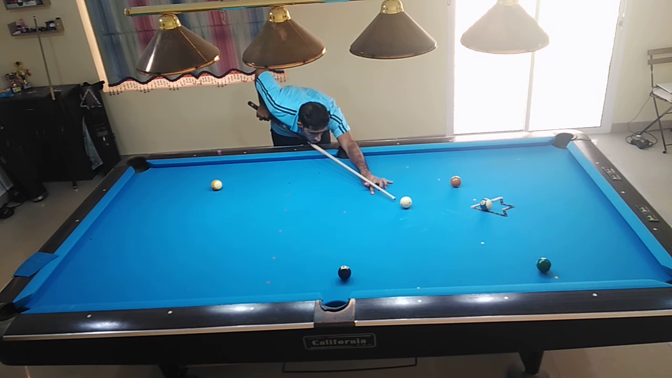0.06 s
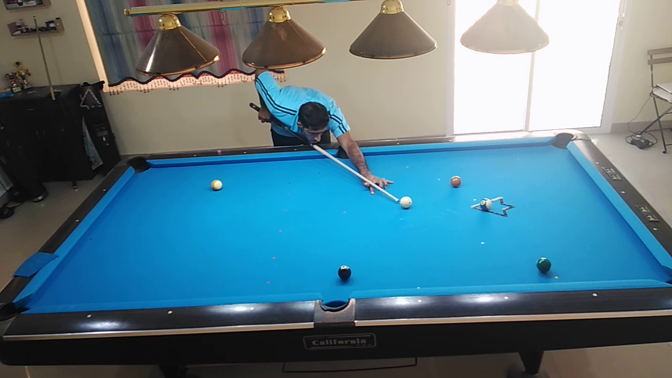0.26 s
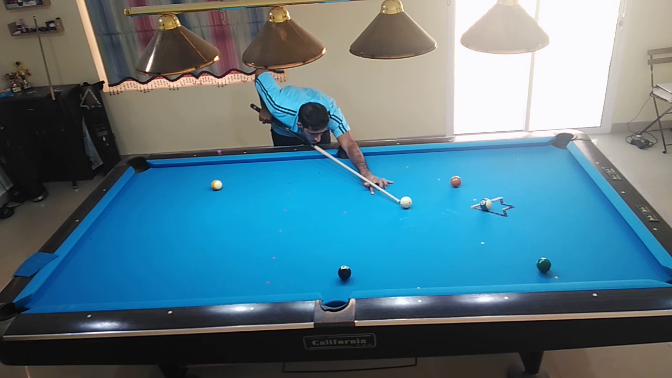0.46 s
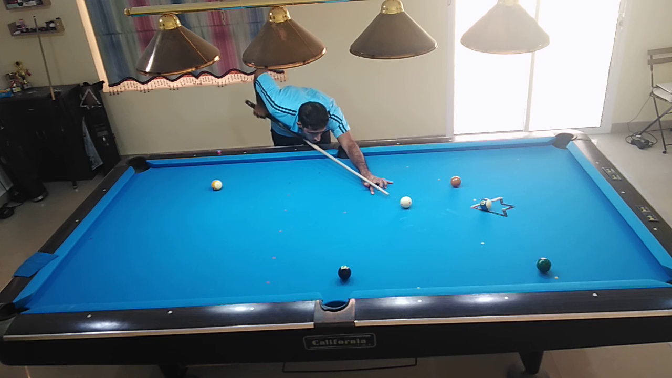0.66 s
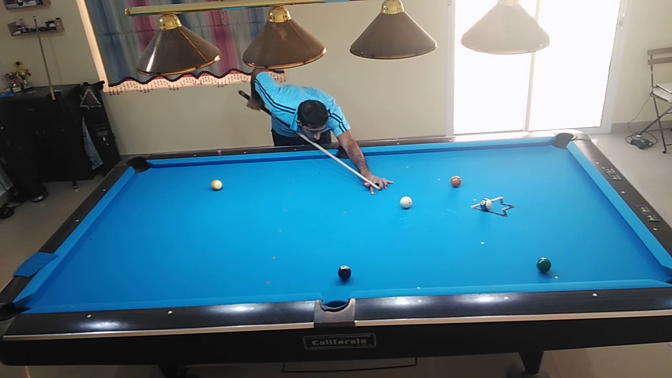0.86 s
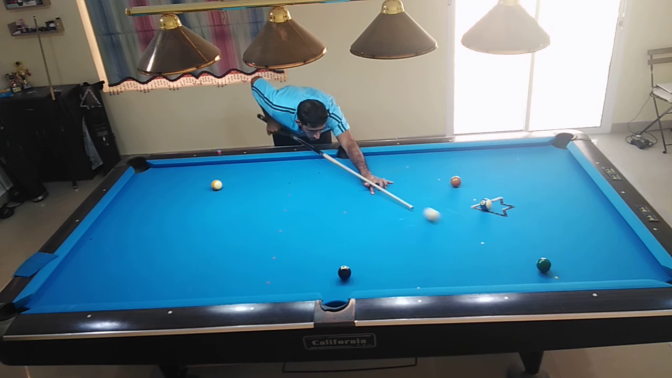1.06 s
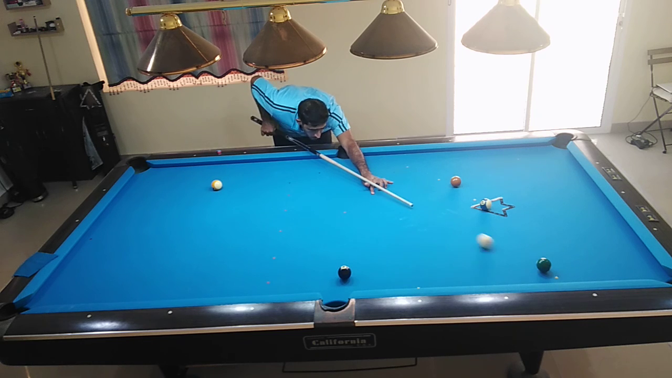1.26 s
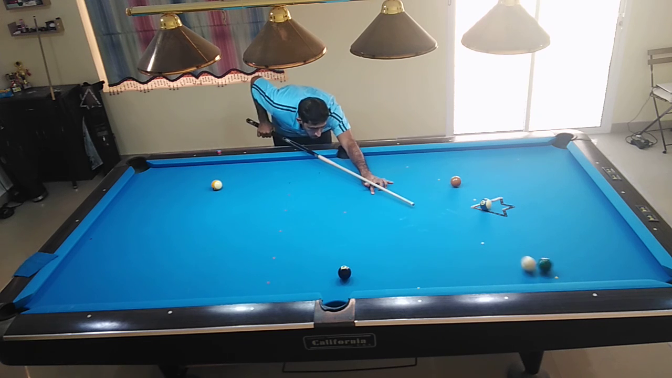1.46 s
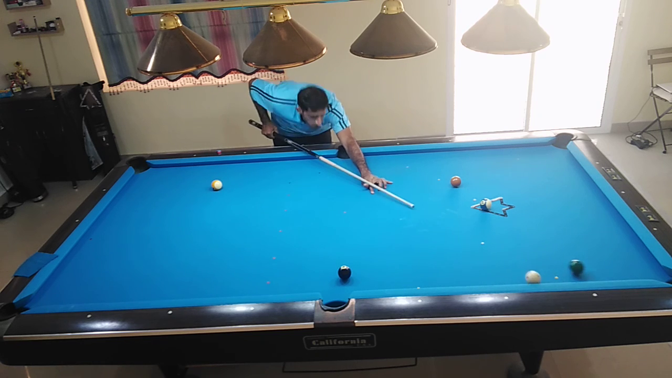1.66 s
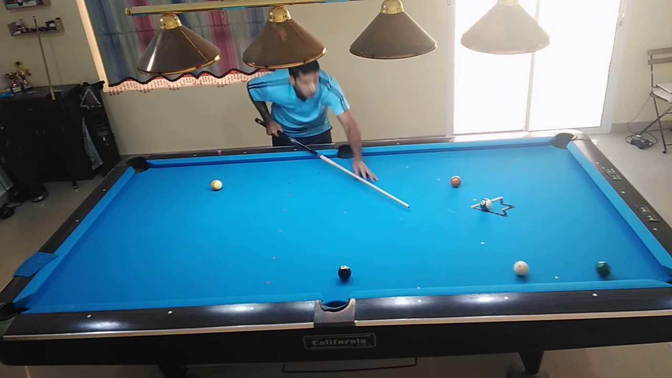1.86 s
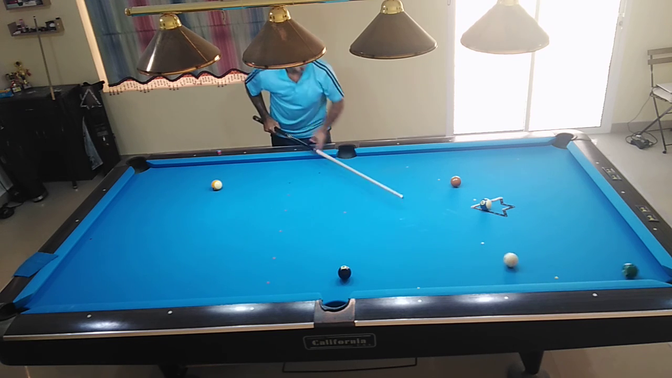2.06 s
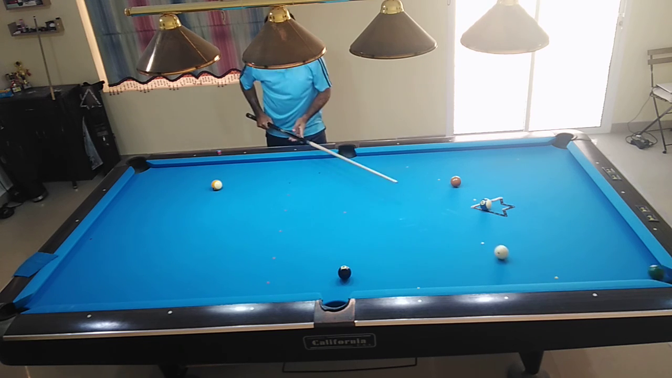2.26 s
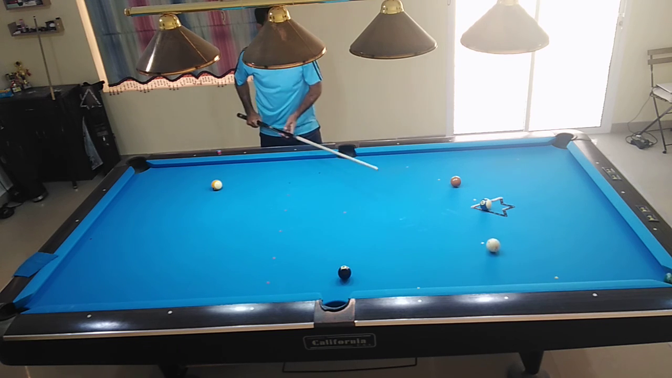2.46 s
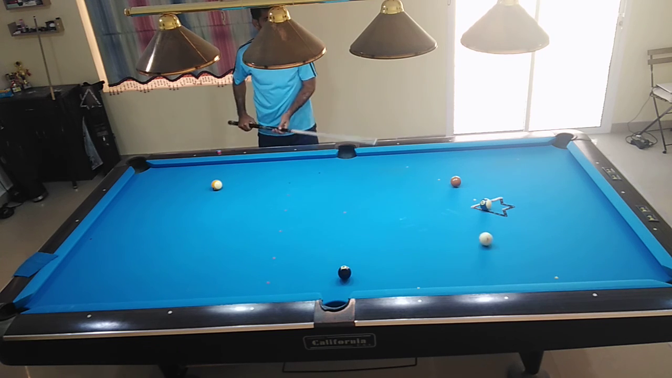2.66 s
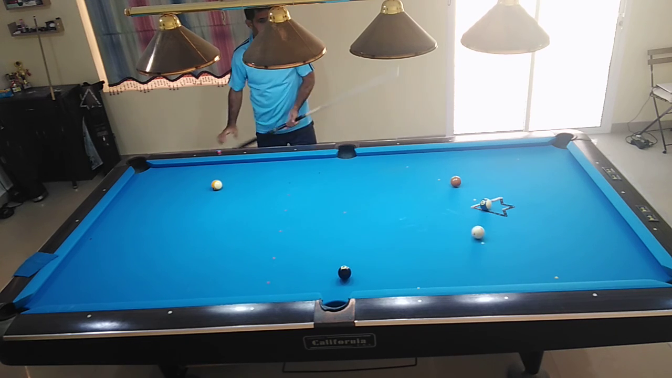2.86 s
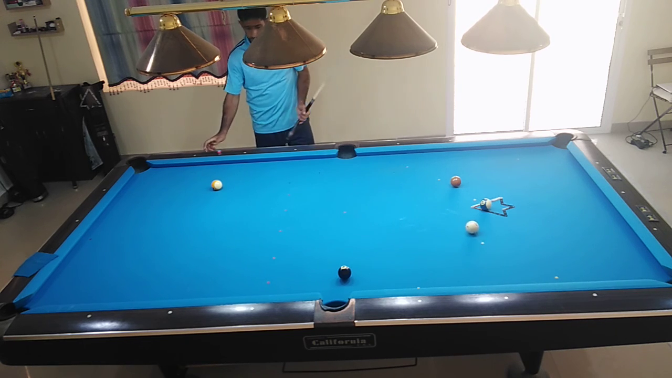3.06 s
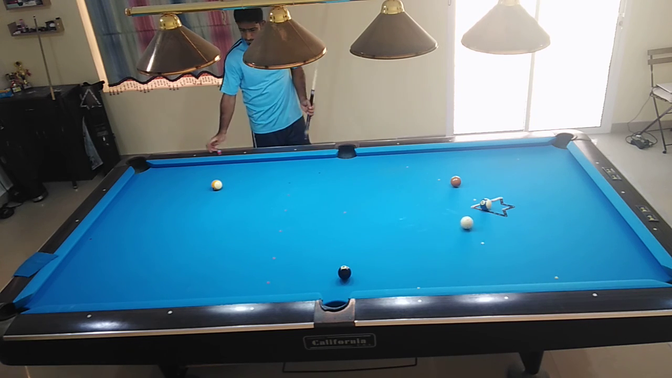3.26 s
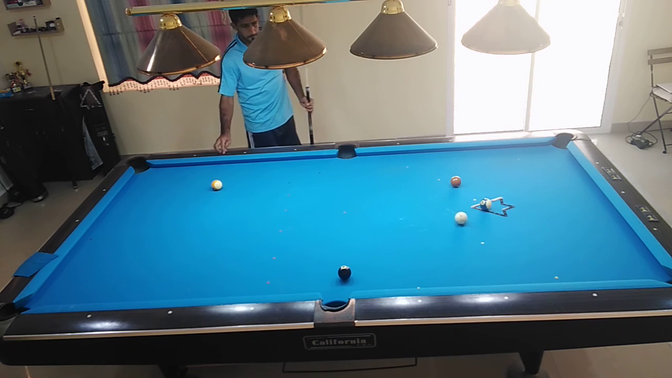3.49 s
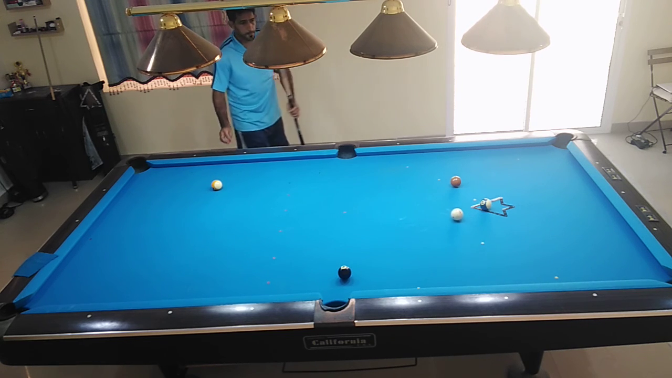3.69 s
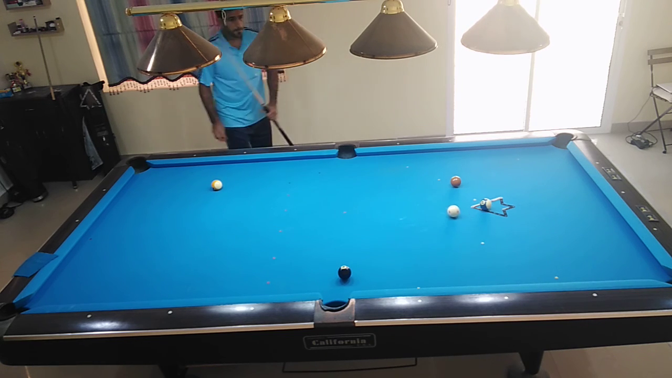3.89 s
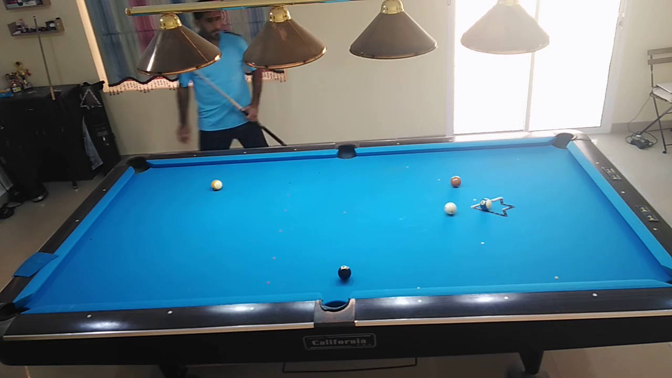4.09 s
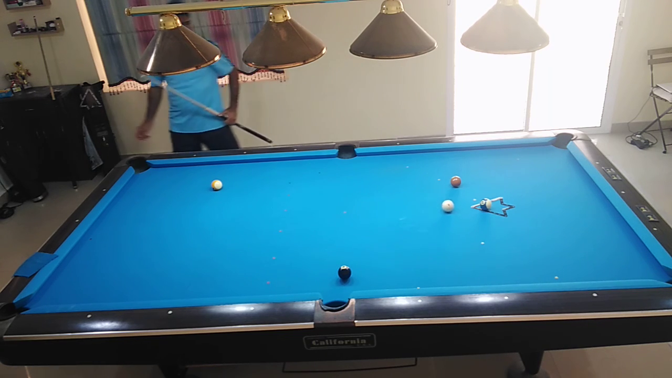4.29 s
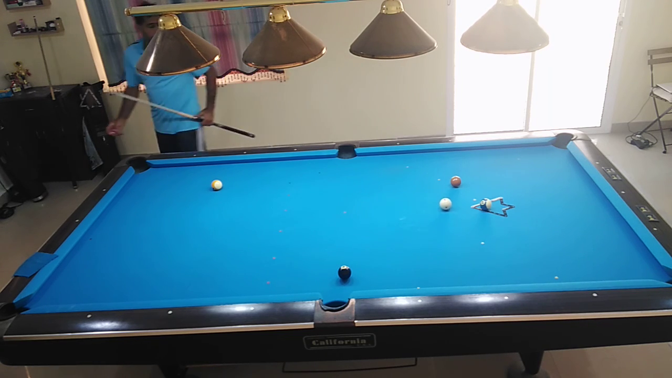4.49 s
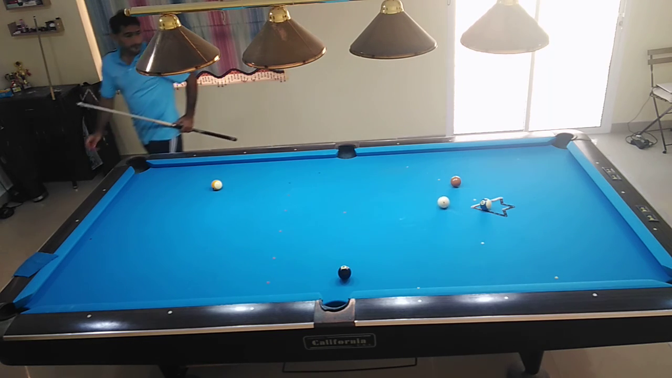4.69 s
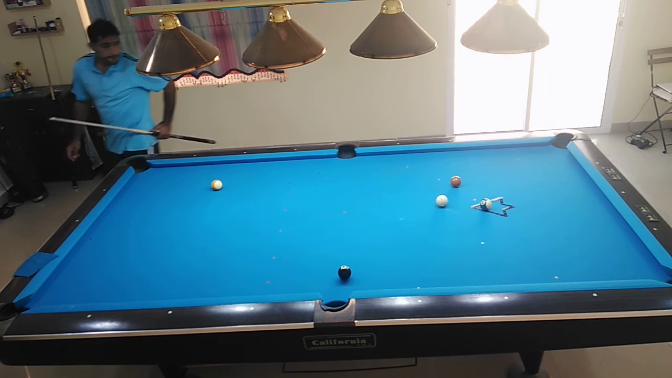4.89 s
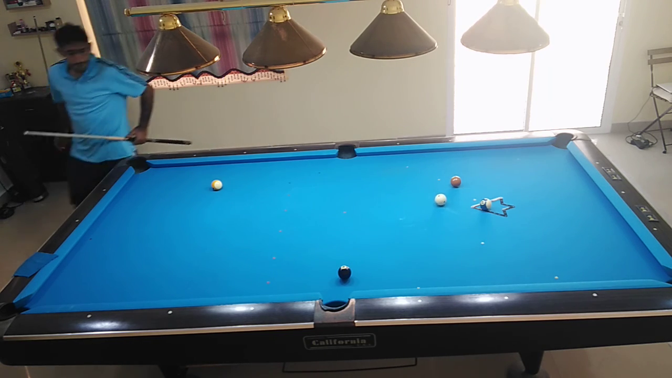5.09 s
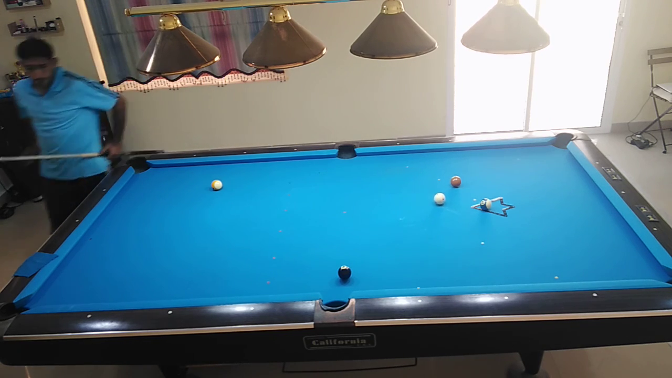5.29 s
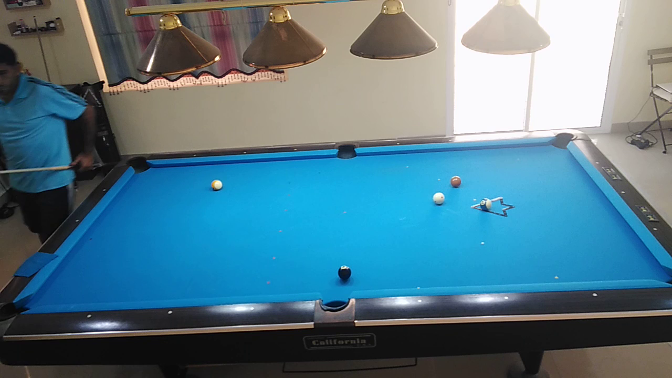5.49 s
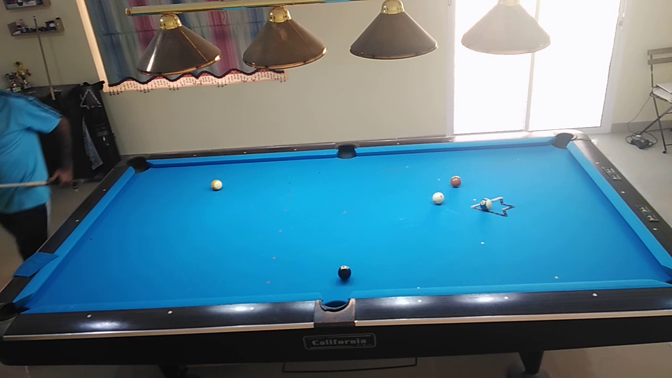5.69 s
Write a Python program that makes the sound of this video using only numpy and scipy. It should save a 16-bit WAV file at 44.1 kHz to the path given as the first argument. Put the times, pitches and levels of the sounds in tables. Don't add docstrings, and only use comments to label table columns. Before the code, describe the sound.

In a bare, reverberant games room, a cue tip taps a ball and half a second later two balls clack dryly. The struck ball rattles into a pocket, bounces down the hollow wooden return with resonant thumps, lands hard in the tray, knocks other balls and settles. Stereo microphones stand some way off, with soft room tone and faint low hum.

```python
import sys
import numpy as np
from scipy import signal
from scipy.fft import rfft, irfft
from scipy.io import wavfile
from scipy.ndimage import uniform_filter1d, map_coordinates

SR = 44100
rng = np.random.default_rng(int(sys.argv[2]) if len(sys.argv) > 2 else 0)


def amplitude_ratio(level_db):
    exponent = np.asarray(level_db, float) / 20
    return 10 ** exponent


def unload_wav(signal):
    wavfile.write(
        sys.argv[1],
        SR,
        np.round(np.clip(np.atleast_2d(signal).T, -1, 1) * 32767).astype(np.int16),
    )


N = 253134
LEFT_LAG = 18

# (frequency [Hz], width [Hz], boost [dB])
CABINET = [(165, 15, 4.6), (201, 41, 5), (278, 10, 9), (351.5, 14, 6), (459, 56, 1), (595, 30, 3.6),
           (658.6, 10, 5.5), (793, 120, 3.1), (1112, 150, 3.8), (2270, 1200, 1.7)]
# (frequency [Hz], level [dB per Hz])
POCKET_TONE = [(40, -28), (70, -6), (130, -5.5), (190, 0.5), (320, -3.5), (450, -7), (680, -5.5),
               (1000, -16.5), (1600, -17.5), (2500, -22.5), (4000, -34), (6000, -45.5), (9000, -57),
               (13000, -62.5)]
# (time [s], peak level [dB], hardness [1 = usual])
BRUSH = [
    (2.848, -32, .7),
    (4.150, -29.5, .9),
    (4.942, -24, 1.4),
]


def unit(x):
    return x / np.sqrt(np.mean(x ** 2) + 1e-20)


def along(points, hz):
    f, v = np.transpose(points)
    return np.interp(np.log(hz + 1), np.log(f + 1), v)


def wobble(rate):
    knots = rng.standard_normal(int(N * rate / SR) + 4)
    return map_coordinates(knots, [np.arange(N) * rate / SR])


def swells(rows, rise_db, fall_db):
    t = np.arange(N) / SR
    levels = []
    for s, hold, db in rows:
        before, after = np.maximum(s - t, 0), np.maximum(t - s - hold, 0)
        levels.append(db - rise_db * before - fall_db * after)
    return np.max(levels, axis=0)


def stereo(z, hz, alike):
    turn = np.arccos(np.clip(along(alike, hz), -1, 1))[:, None] / 2
    mid, side = z[0] * np.cos(turn), z[1] * np.sin(turn)
    return np.array([mid + side, mid - side])


def pulse(tone, modes, hardness):
    hz = np.fft.rfftfreq(8192, 1 / SR)
    db = along(tone, hz) + 6 * (hardness - 1) * np.log2(np.clip(hz, 100, 8000) / 600)
    db = db - 40 * np.log2(np.maximum(hz / tone[-1][0], 1))
    for centre, width, boost_db in modes:
        db = db + boost_db / (1 + (2 * (hz - centre) / width) ** 2)
    ceps = irfft(np.log(amplitude_ratio(np.maximum(db, db.max() - 110))))
    ceps[1:4096] *= 2
    ceps[4097:] = 0
    shape = irfft(np.exp(rfft(ceps)))
    return shape / np.linalg.norm(shape)


def room(direct, rise):
    # (frequency [Hz], t60 [s])
    decay = [(100, 0.95), (300, 0.63), (550, 0.59), (800, 0.55), (1200, .55), (2000, 0.72), (5000, 0.78),
             (8000, 0.88), (12000, 0.41)]
    # (frequency [Hz], left-right likeness [-1..1])
    likeness = [(60, .93), (250, .88), (400, .8), (700, .5), (1200, .05), (4000, .05)]
    hz, t, z = signal.stft(rng.standard_normal((2, SR * 13 // 20)), SR, nperseg=256)
    t60 = along(decay, hz)[:, None]
    bloom = 1 - np.exp(-t / 0.033 * (hz[:, None] / 170) ** 2)
    z = stereo(z, hz, likeness) * bloom * amplitude_ratio(-60 * t / t60) / np.sqrt(t60)
    tail = signal.istft(z, SR, nperseg=256)[1]
    t = np.arange(tail.shape[1]) / SR
    density = np.clip(0.012 + (t / .2) ** 2, .002, 1)
    echoes = rng.standard_normal(len(t)) * (rng.random(len(t)) < density) / np.sqrt(density)
    early = echoes * amplitude_ratio(-60 * t / 0.22) * 0.081
    early = np.array([np.roll(early, LEFT_LAG), early])
    tail = tail / np.std(tail[:, :SR // 20]) * .1 + early
    tail = tail * (1 - np.exp(-t / rise))
    tail = tail / np.linalg.norm(tail[0])
    tail[[0, 1], [LEFT_LAG, 0]] += direct
    return tail


def blows(events, tone, modes, trim_db, direct, rise):
    out = np.zeros((2, N + 2 * SR))
    for s, db, hardness, pan_db in events:
        hit = pulse(tone, modes, hardness)
        heard = signal.fftconvolve(room(direct, rise), hit[None], axes=1)
        gain = amplitude_ratio(db + trim_db + np.array([[.5], [-.5]]) * pan_db)
        out[:, round(s * SR):][:, :heard.shape[1]] += gain * heard
    return out[:, :N]


def rattle(rule, count, hardness, pan_db):
    soft, soften_s, drift_db = .6, .09, 3
    s, db, gap, stretch, fade_db = rule
    gaps = gap * stretch ** np.arange(count)
    t = np.cumsum(gaps) - gaps
    fresh = np.exp(-t / soften_s)
    hard = soft + (hardness - soft) * fresh
    return list(zip(s + t, db - fade_db * t, hard, pan_db + drift_db * (1 - fresh)))


def room_tone():
    # (frequency [Hz], level [dB per Hz])
    air_tone = [(30, -29.5), (55, -6), (90, -4), (125, -3), (175, -5), (230, -6.5), (350, -4), (500, -6),
                (750, -12), (1200, -17.0), (2000, -22.5), (3000, -32.0), (4500, -43.0), (7000, -54),
                (10000, -62), (13000, -61.5)]
    # (frequency [Hz], left-right likeness [-1..1])
    likeness = [(60, 0.93), (130, 0.95), (290, 0.84), (620, 0.51), (1360, -0.25), (2980, 0.22)]
    hz, _, z = signal.stft(rng.standard_normal((2, N)), SR, nperseg=2048)
    field = rng.standard_normal(z.shape[1:])
    field = uniform_filter1d(uniform_filter1d(field, 15, 0), 3, 1)
    patches_db = 2.2 * unit(field) / (1 + hz[:, None] / 900)
    z = stereo(z, hz, likeness) * amplitude_ratio(along(air_tone, hz)[:, None] + patches_db)
    return unit(signal.istft(z, SR, nperseg=2048)[1][:, :N]) * amplitude_ratio(-53.5)


def floor_rumble():
    # (start [s], length [s], level [dB])
    shudders = [
        (.24, .14, -56),
        (2.72, .06, -40),
        (2.95, .3, -46),
        (3.75, .02, -57),
        (4.3, .08, -52),
    ]
    band = signal.butter(2, [55, 120], "band", fs=SR, output="sos")
    low = signal.sosfilt(band, rng.standard_normal(N))
    return unit(low) * (amplitude_ratio(-72) + amplitude_ratio(swells(shudders, rise_db=70, fall_db=60)))


def appliances():
    # (frequency [Hz], level [dB rms])
    motor_lines = [(87, -67.5), (177, -57)]
    t = np.arange(N) / SR
    out = np.zeros(N)
    for hz, db in motor_lines:
        level = amplitude_ratio(db - 1 + wobble(36))
        out += level * np.sin(2 * np.pi * hz * t + 1.4 * wobble(9.2))
    return out


def foot_shifts():
    # (time [s], peak level [dB])
    thuds = [(0.149, -56), (0.244, -41.5), (0.355, -46), (0.488, -49), (0.949, -37), (1.549, -44),
             (2.414, -44.5), (2.437, -46), (2.494, -40.5), (3.598, -28), (3.704, -33.5), (3.739, -32),
             (3.89, -54.5), (5.147, -39)]
    # (frequency [Hz], level [dB per Hz])
    thud_tone = [(25, -47), (50, -17), (85, 5.5), (180, -3.5), (450, -12), (900, -29.5), (1500, -57.5)]
    events = [(s, db, .8, 0) for s, db in thuds]
    return blows(events, thud_tone, [], 15, direct=2.5, rise=.01)


def far_tick():
    # (time [s], peak level [dB], hardness [1 = usual], left-right [dB])
    ticks = [
        (5.342, -66.5, 1, 1),
    ]
    # (frequency [Hz], level [dB per Hz])
    tick_tone = [(1500, -30), (3000, 2), (5000, -3), (7500, -11)]
    return blows(ticks, tick_tone, [], 25, direct=0.36, rise=.005)


def cue_strike():
    # (time [s], peak level [dB], hardness [1 = usual], left-right [dB])
    strikes = [
        (0.942, -21, 0.85, 1),
    ]
    # (frequency [Hz], level [dB per Hz])
    strike_tone = [(150, -29), (250, -19), (430, -7), (600, 0), (800, 1), (1010, 2), (1300, -4.5),
                   (1630, -13.5), (2050, 0), (2600, -12), (3400, -6), (4300, -15), (5200, -20.5),
                   (6500, -32), (8000, -43), (10000, -62.5)]
    # (frequency [Hz], width [Hz], boost [dB])
    shaft = [(791, 40, 5), (985, 50, 5), (2058, 40, 9), (2358, 30, 11), (2724, 40, 7), (3075, 60, 9),
             (3410, 50, 6), (4156, 40, 9), (5023, 50, 6), (5755, 50, 6)]
    return blows(strikes, strike_tone, shaft, 26.5, direct=.15, rise=.005)


def ball_clack():
    # (time [s], peak level [dB])
    clacks = [
        (1.4316, -34),
        (1.4365, -33),
        (1.4405, -33),
        (1.4432, -20.5),
        (1.4458, -14.5),
        (1.4479, -16.5),
        (1.4604, -21.5),
        (1.483, -21.5),
    ]
    # (frequency [Hz], level [dB per Hz])
    clack_tone = [(360, -36), (600, -31), (850, -19.5), (1150, -13), (1550, -5), (2000, 0.5), (2400, 0),
                  (2900, -6.0), (3500, -15.5), (4300, -34), (5200, -49.5), (6500, -54.5), (8500, -67.5)]
    events = [(s, db, .85, 0) for s, db in clacks]
    return blows(events, clack_tone, [], 17.45, direct=0.43, rise=0.004)


def track_roll():
    # (start [s], length [s], level [dB])
    runs = [
        (2.69, .1, -34),
        (2.94, .03, -39),
        (3.09, .04, -25),
        (3.26, .08, -29),
        (3.44, .04, -21.5),
        (3.59, .02, -32),
        (3.71, .04, -37),
    ]
    # (frequency [Hz], level [dB per Hz])
    bump_tone = [(35, -29), (80, -27.5), (150, 1.5), (220, -1.5), (300, -8), (450, -9.5), (670, -7),
                 (1080, -20.5), (1600, -48), (2500, -54.5), (4000, -67)]
    chance, size = rng.random((2, N)), rng.standard_normal((2, N))
    bumps = (chance < 600 / SR) * size
    drum = signal.fftconvolve(bumps, pulse(bump_tone, CABINET, 0.62)[None], axes=1)[:, :N]
    pair = np.array([drum[0] + .35 * drum[1], drum[0] - .35 * drum[1]])
    return unit(pair) * amplitude_ratio(swells(runs, rise_db=160, fall_db=260) - 3.5)


def pocket_drop():
    # (start [s], first peak [dB], first gap [s], gap growth [ratio], fade [dB/s])
    rim = (2.562, -27, .004, 1.35, -330)
    # (start [s], first peak [dB], first gap [s], gap growth [ratio], fade [dB/s])
    inside = (2.609, -15, .02, 1.11, 30)
    on_rim = rattle(rim, count=4, hardness=1.5, pan_db=.4)
    in_pocket = rattle(inside, count=6, hardness=.78, pan_db=.4)
    out = blows(on_rim, POCKET_TONE, CABINET, 22.8, direct=0.091, rise=0.0033)
    return out + blows(in_pocket, POCKET_TONE, CABINET, 22.7, direct=0.079, rise=0.0048)


def gully_lip():
    # (start [s], first peak [dB], first gap [s], gap growth [ratio], fade [dB/s])
    lip = (2.967, -19.5, .01, 1.9, -55)
    # (frequency [Hz], level [dB per Hz])
    lip_tone = [(60, -19.5), (200, 0), (450, 3.5), (700, 3), (1000, -6.5), (1500, -18), (2500, -27.5),
                (4000, -40.5), (6000, -47.5), (9000, -63.5)]
    # (start [s], first peak [dB], first gap [s], gap growth [ratio], fade [dB/s])
    fall = (3.088, -8, .02, .7, 480)
    # (frequency [Hz], level [dB per Hz])
    fall_tone = [(200, -26.5), (600, -18.5), (900, -10.5), (1110, 4.5), (1400, -10.5), (2200, -16),
                 (3200, -32), (4500, -50), (6500, -69)]
    clips = rattle(lip, count=4, hardness=1.45, pan_db=.3)
    drops = rattle(fall, count=3, hardness=1.3, pan_db=.4)
    out = blows(clips, lip_tone, CABINET, 21, direct=0.11, rise=0.002)
    return out + blows(drops, fall_tone, CABINET, 22, direct=.25, rise=.003)


def gully_run():
    # (start [s], first peak [dB], first gap [s], gap growth [ratio], fade [dB/s])
    gully = (3.115, -11, .051, .985, 21)
    # (start [s], first peak [dB], first gap [s], gap growth [ratio], fade [dB/s])
    runout = (3.579, -28.5, .064, 1.1, 80)
    # (frequency [Hz], level [dB per Hz])
    gully_tone = [(40, -36.5), (90, -2.5), (190, -0.5), (300, 1.5), (480, 0), (670, 3), (900, -3.5),
                  (1100, -3.5), (1400, -11.5), (2200, -27.5), (3200, -44.5), (4500, -64.5), (6500, -67.5),
                  (9000, -78)]
    down = [(*BRUSH[0], 1)]
    down += rattle(gully, count=9, hardness=.75, pan_db=.8)
    down += rattle(runout, count=3, hardness=.45, pan_db=4)
    return blows(down, gully_tone, CABINET, 22.9, direct=0.27, rise=.004)


def tray_landing():
    # (start [s], first peak [dB], first gap [s], gap growth [ratio], fade [dB/s])
    tray = (4.1555, -4.6, .0115, 1.29, 42)
    # (frequency [Hz], level [dB per Hz])
    tray_tone = [(50, -30.5), (120, -14), (240, -8.0), (370, 0.5), (540, -7), (820, -4), (1130, -7),
                 (1570, -20.5), (2100, -22), (2800, -38.5), (3600, -47), (5000, -60), (7000, -65.5),
                 (9500, -80.5)]
    landing = [(*BRUSH[1], 1)] + rattle(tray, count=10, hardness=1.25, pan_db=-.6)
    return blows(landing, tray_tone, CABINET, 22.5, direct=.2, rise=.003)


def stack_knock():
    # (start [s], first peak [dB], first gap [s], gap growth [ratio], fade [dB/s])
    stack = (4.607, -5, .012, 1.4, 190)
    # (start [s], first peak [dB], first gap [s], gap growth [ratio], fade [dB/s])
    rebound = (4.712, -10.5, .036, .85, 80)
    # (frequency [Hz], level [dB per Hz])
    stack_tone = [(80, -39), (190, -19), (340, 1), (430, -7), (610, 2.5), (780, 0), (1000, -6.5),
                  (1500, -17.5), (2200, -19.5), (3000, -29.0), (4200, -37.5), (6000, -45.5), (8500, -56.5),
                  (12000, -76)]
    knocks = rattle(stack, count=4, hardness=1.03, pan_db=.4)
    knocks += rattle(rebound, count=3, hardness=.65, pan_db=2.5)
    return blows(knocks, stack_tone, CABINET, 22.5, direct=.2, rise=.003)


def settling():
    # (start [s], first peak [dB], first gap [s], gap growth [ratio], fade [dB/s])
    settle = (4.951, -12.5, .016, 1.55, 30)
    # (frequency [Hz], level [dB per Hz])
    settle_tone = [(78, -51), (130, -30.5), (260, -13.5), (420, -6), (590, 0.0), (800, -4), (1050, -7.5),
                   (1350, -16.5), (1900, -20.5), (2500, -29), (3200, -48), (4200, -60.5), (6000, -75)]
    rest = [(*BRUSH[2], 1)] + rattle(settle, count=4, hardness=1.1, pan_db=-1.2)
    return blows(rest, settle_tone, CABINET, 23.5, direct=0.3, rise=0.002)


def scene():
    background = room_tone() + floor_rumble() + appliances() + foot_shifts() + far_tick()
    play = cue_strike() + ball_clack()
    ball_return = track_roll() + pocket_drop() + gully_lip() + gully_run()
    return background + play + ball_return + tray_landing() + stack_knock() + settling()


def top_cut(x):
    return signal.sosfilt(signal.butter(12, 14150, fs=SR, output="sos"), x)


def record(dry):
    # (start [s], gain [dB], treble
    # [dB], whine [dB])
    openings = [
        (0.965, -.3, 2, 11),
        (2.56, 1.5, 3.7, 13),
        (2.965, 0.4, -.3, 3),
        (3.115, 3.3, -1, 0.1),
        (4.156, 0.1, 2.3, 10),
        (4.592, 1, 3, 20),
        (5.03, -2.5, .1, .1),
    ]
    # (frequency [Hz], level [dB rms])
    circuit = [(7795, -94), (11660, -97)]
    open_s = .234
    t = np.arange(N) / SR
    gain_db, treble_db, whine_db = sum(np.outer(lift, (t > s) & (t < s + open_s)) for s, *lift in openings)
    x = signal.sosfilt(signal.butter(2, 48, "high", fs=SR, output="sos"), dry)
    x = x * amplitude_ratio(-1 + uniform_filter1d(gain_db, 500))
    treble = x - signal.sosfiltfilt(signal.butter(2, 1100, fs=SR, output="sos"), x)
    x = x + treble * (amplitude_ratio(uniform_filter1d(treble_db, 500)) - 1)
    drift = .6 * wobble(60)
    lifts_db = uniform_filter1d([whine_db, 3.5 * treble_db], 500)
    whine = np.zeros(N)
    for (hz, db), lift_db in zip(circuit, lifts_db):
        whine += amplitude_ratio(db + lift_db) * np.sin(2 * np.pi * hz * t + drift)
    x = x + whine * amplitude_ratio([[0], [-15]])
    x = x / (1 + np.abs(x / 0.77) ** 4) ** (1 / 4)
    return top_cut(x)


dry = scene()
out = record(dry)
unload_wav(out)
```